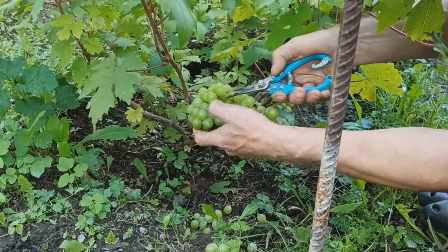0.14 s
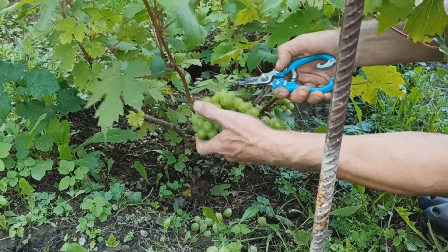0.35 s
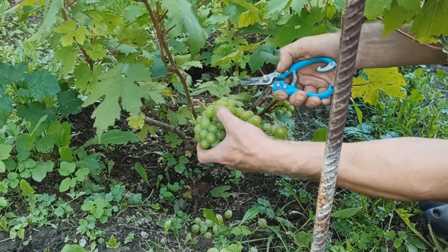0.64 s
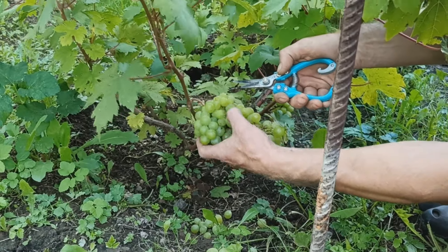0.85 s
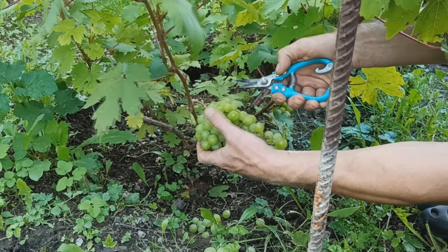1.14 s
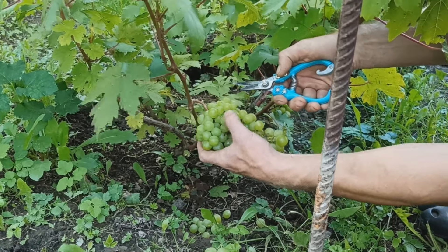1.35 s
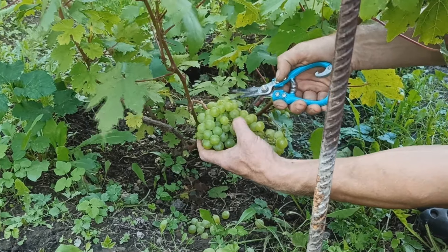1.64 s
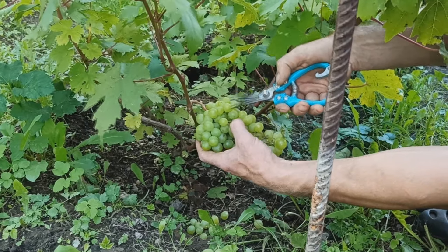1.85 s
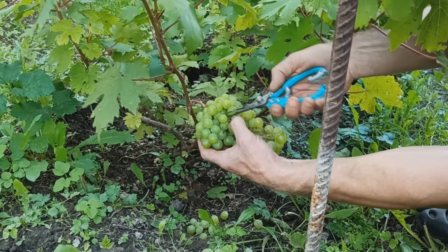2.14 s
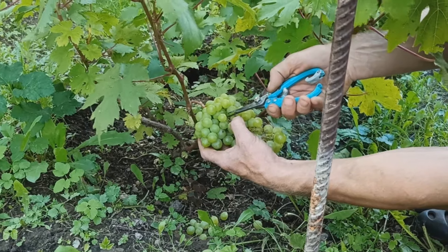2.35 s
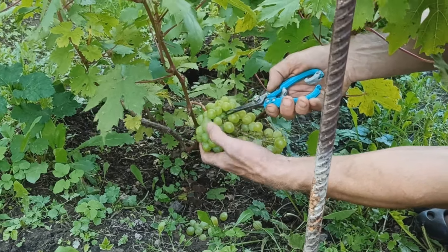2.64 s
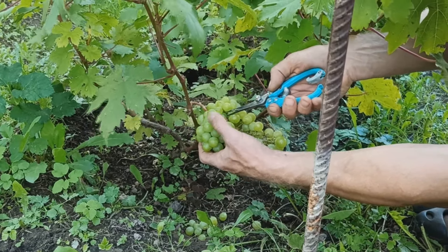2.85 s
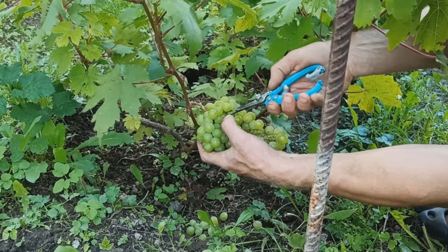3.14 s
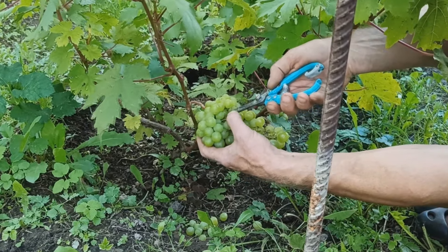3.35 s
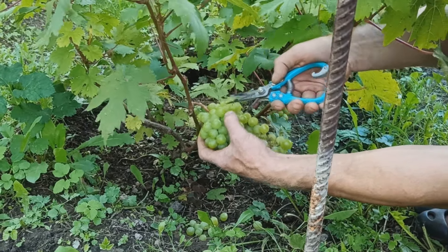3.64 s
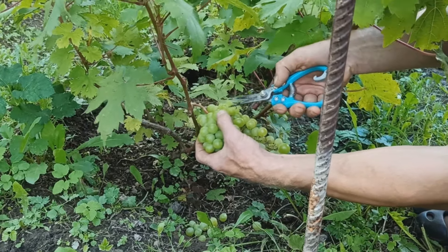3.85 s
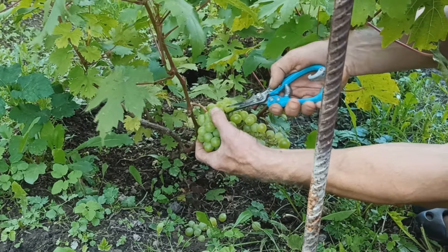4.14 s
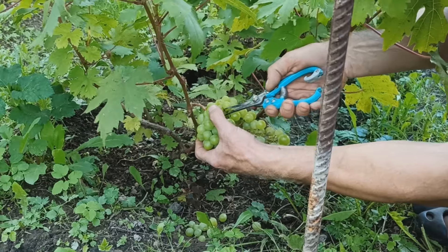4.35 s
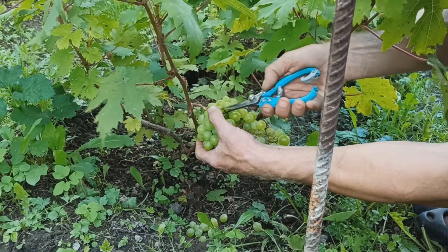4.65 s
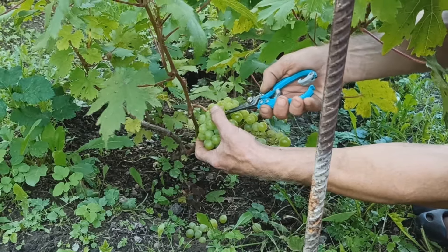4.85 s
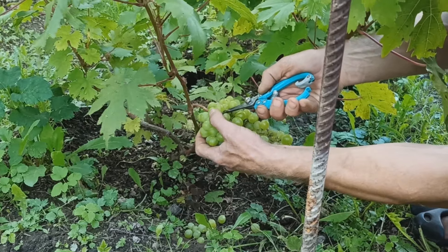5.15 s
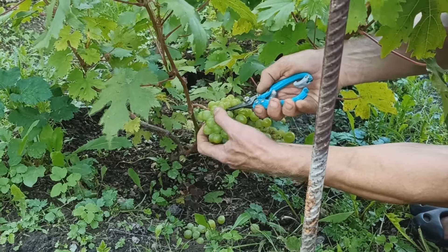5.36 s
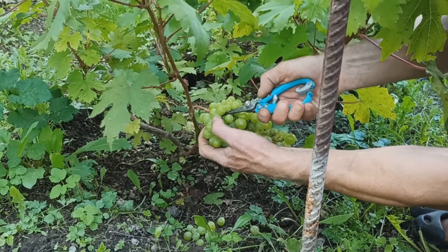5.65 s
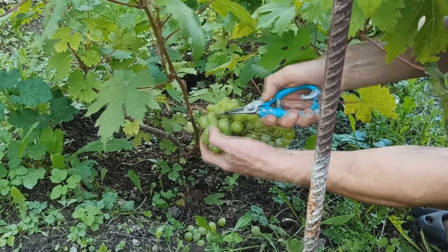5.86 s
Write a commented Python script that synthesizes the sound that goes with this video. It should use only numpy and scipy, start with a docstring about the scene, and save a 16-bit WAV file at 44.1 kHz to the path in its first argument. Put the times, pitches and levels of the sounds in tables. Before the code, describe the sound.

Faint metallic clicks and soft rubbing of garden shears among grapes over a low outdoor rumble, then a single crisp cut.

```python
"""A quiet garden rumbles faintly, and small pruning shears rub and tick in a tight bunch of grapes.
Friction between the berries makes a grainy rustle; each nicked stalk crunches and rings the steel.
Two cut berries thud on the soil, a few dull bumps pass, and the pivot squeaks by stick-slip friction.
Near the end a stalk fractures and the shears snap shut with one sharp snip."""
import sys
import numpy as np
from scipy import signal
from scipy.fft import rfft, irfft, next_fast_len
from scipy.io import wavfile

SR = 44100
rng = np.random.default_rng(int(sys.argv[2]) if len(sys.argv) > 2 else 0)


def store_wav(level_fs):
    """Save 16-bit WAV to argv[1]."""
    pcm = np.round(np.clip(np.atleast_2d(level_fs), -1, 1) * 32767)
    wavfile.write(sys.argv[1], SR, pcm.T.astype(np.int16))


N = 265261
TIME = np.arange(N) / SR
LEAD_S = 0.01  # room before each blow
BLOW_TIME = np.arange(SR // 6) / SR - LEAD_S
RING_TIME = np.maximum(BLOW_TIME, 0)


def amp(db):
    """Amplitude grows tenfold for every 20 dB."""
    return 10 ** (np.asarray(db) / 20)


def unit_rms(x):
    """Normalisation to a mean power of 1."""
    return x / np.sqrt(np.mean(x ** 2) + 1e-20)


def colour(x, points):
    """Spectral shaping: (frequency_hz, gain_db) points are joined along log frequency."""
    hz, db = np.transpose(points)
    size = next_fast_len(2 * len(x))
    bins = np.fft.rfftfreq(size, 1 / SR)
    gain = amp(np.interp(np.log(bins + 1), np.log(np.sort(hz) + 1), db))
    return irfft(rfft(x, size) * gain, size)[:len(x)]


def wander(hz):
    """Band-limited noise: a random fluctuation of rms 1, up to the given rate."""
    passband = np.fft.rfftfreq(N, 1 / SR) < hz
    return unit_rms(irfft(rfft(rng.standard_normal(N)) * passband, N))


def add(mix, start_s, sound):
    """Superposition: a sound adds to the mix from its start time."""
    part = mix[max(round(start_s * SR), 0):][:len(sound)]
    part += sound[:len(part)]


def ring(modes, detune=0):
    """Free vibration: a blow excites damped modes, each optionally detuned at random."""
    out = np.zeros(len(RING_TIME))
    for hz, db, t60 in modes:
        pitch_hz = hz * (1 + detune * rng.standard_normal())
        out += amp(db - 60 * RING_TIME / t60) * np.sin(2 * np.pi * pitch_hz * RING_TIME)
    return out


def crack(length_s):
    """Fracture radiates a brief noise burst, here with an even spectrum and energy 1."""
    age = BLOW_TIME / max(length_s / 2, 4 / SR)
    spectrum = rfft(rng.standard_normal(len(age)) * np.maximum(age, 0) * np.exp(-abs(age)))
    whitened = irfft(spectrum / (abs(spectrum) + 1e-12), len(age))
    burst = whitened * np.exp(-((age - 2) / 10) ** 2)
    return burst / np.linalg.norm(burst)


def foliage(x, level_db, t60_s):
    """Scattering from hands, leaves and ground adds a short diffuse tail."""
    t = np.arange(SR // 5) / SR
    build_up = 1 - np.exp(-(t / 0.0013) ** 2)
    tail = rng.standard_normal(len(t)) * amp(-60 * t / t60_s) * build_up
    return x + amp(level_db) * signal.oaconvolve(x, tail / np.linalg.norm(tail))[:N]


# Spectrum of the far outdoor rumble: frequency_hz, gain_db
RUMBLE_SPECTRUM = [(25, -21), (40, -17), (55, -10.5), (72, -3), (88, 1), (115, -2.5), (175, -3.5),
                   (215, -7.5), (320, -9), (550, -15), (720, -18), (900, -18), (1100, -23.5), (1400, -24),
                   (2600, -32), (4500, -38), (8000, -54)]

def garden(level_db=-59.5, easing_db_per_s=0.23):
    """Distant sound arrives as low-frequency noise, its level easing very slowly."""
    rumble = unit_rms(colour(rng.standard_normal(N), RUMBLE_SPECTRUM))
    return amp(level_db - easing_db_per_s * TIME) * rumble


def stroke(start_s, length_s, rise_s=0.024, fall_s=0.027):
    """Exponential envelope of the hand's pressure: 20 dB up per rise_s, a hold, 20 dB down per fall_s."""
    before = np.maximum(start_s - TIME, 0)
    after = np.maximum(TIME - start_s - length_s, 0)
    return amp(-20 * (before / rise_s + after / fall_s))


# Modes of the shears, shared by rubbing, ticks and snip: frequency_hz, level_db, t60_s
SHEAR_MODES = [(945, -7, .032), (1340, -16, .021), (1825, -14.5, .025), (2255, -13, .031),
               (3420, -12, .024), (3730, -8, .021), (4300, -15, .022), (4745, -19, .048), (5040, -11, .012),
               (5320, -4.5, .022), (6285, -10, .032), (6580, -2.5, .01), (6795, .5, .013),
               (7190, -12, .016), (7380, -12, .042), (7655, -5, .029), (8095, -9, .025), (8400, 1, .016),
               (12030, -8, .016), (12420, -11, .015), (13140, -8, .016), (13930, -12, .011),
               (14800, -10.5, .011)]
# Spectrum of the friction noise: frequency_hz, gain_db
RUB_SPECTRUM = [(300, -27), (2500, -10), (3600, 3), (5500, -3), (6800, -1), (8500, -3), (12000, -8),
                (16000, -17)]
# Strokes of the blades among the berries: start_s, length_s, level_db
BLADE_STROKES = [(0.24, 1.4, -82.5), (0.7, 0.0075, -66), (1.965, 0.24, -76), (3.682, .03, -73),
                 (4.37, 0.074, -78.5), (5.698, 0.24, -75.5), (5.75, 0.051, -56.5), (5.976, .04, -62.5)]

def rubbing(slips_per_s=2500, holding_db=-85):
    """Sliding friction: dense small slips of steel on steel and grape skin, under an uneven hand."""
    stroke_power = sum((amp(db) * stroke(start, length)) ** 2 for start, length, db in BLADE_STROKES)
    pressure = np.sqrt(amp(holding_db) ** 2 + stroke_power)  # the held bunch shifts between strokes
    slips = rng.standard_normal(N) * (rng.random(N) < slips_per_s / SR)
    steel = signal.oaconvolve(slips, ring(SHEAR_MODES))[:N]
    grain = unit_rms(slips) + amp(-8.5) * unit_rms(steel)
    return pressure * amp(2 * wander(hz=59.7)) * unit_rms(colour(grain, RUB_SPECTRUM))


# Modes of the light return spring: frequency_hz, level_db, t60_s
SPRING_MODES = [(3700, 4, 0.036), (4260, -9, 0.043), (6680, -1, 0.031), (7500, -1, 0.033),
                (13000, 0.5, 0.041)]
# Spectrum common to all ticks: frequency_hz, gain_db
TICK_SPECTRUM = [(100, 3), (900, 1.5), (2900, 2), (3600, 1.5), (4200, 5.5), (5300, 1), (6500, -2.5),
                 (8500, -8.5), (13000, 0), (16000, -1.5)]
# Tone of the faintest touches of the tips: top_treble_db, low_treble_db, knock_db
GRAZE_BALANCE = (-18, -10, -10)
# Blade ticks: start_s, relative_level_db, top_treble_db, low_treble_db, knock_db
BLADE_TICKS = [(0.258, -41, -2.5, -23, -25), (0.3314, -39.5, -13, -13.5, -31),
               (0.377, -41.5, -5, -12.5, -24), (0.4068, -48.5, -1, -10, -16), (0.4197, -55, -5, -2, -13),
               (0.465, -55.5, -14, -5, -10), (0.488, -45.5, -14, -9.5, -23), (0.622, -41, -15, -11.5, -15),
               (2.078, -47.5, -21, -15, -4.5), (2.1629, -33.5, -12, -17.5, -20),
               (2.166, -40, -22, -23, -22), (2.184, -37, -19, -15.5, -10.5), (2.309, -48.5, -25, -14, -0.5),
               (2.9383, -34, -12.5, -29, -32), (3.1417, -35, -19, -16, -36), (3.165, -39.5, -14, -13, -22),
               (3.3936, -47, -28, -25, -21), (4.0763, -55.5, -18, -4.5, -1), (4.7618, -41.5, -17, -17, -26),
               (4.793, -39.5, -11, -13.5, -15), (5.144, -56.5, -14, -3, -4), (5.323, -47.5, -14, -9, -22),
               (5.3342, -39.5, -11, -12, -28), (5.346, -39.5, -13, -12.5, -23), (5.388, -40, -10, -22, -29),
               (5.4756, -51.5, -17, -7.5, 1), (5.5025, -51, -12, -16, -18), (5.7497, -36, -7.5, -16.5, -7),
               (5.8232, -43.5, -18, -7.5, -20)]

def ticks(grazes_per_s=2.5, graze_db=-62.5, firm_db=-34, firm_crunch_s=0.0013):
    """Impulsive excitation: the tips nick thin stalks, which crunch and set steel and spring ringing."""
    out = np.zeros(N)
    graze_times = np.flatnonzero(rng.random(N) < grazes_per_s / SR) / SR
    grazes = [(s, graze_db + 3 * rng.standard_normal(), *GRAZE_BALANCE) for s in graze_times]
    for start_s, db, top_db, low_db, knock_db in BLADE_TICKS + grazes:
        crunch = crack(firm_crunch_s * 2 ** ((firm_db - db) / 19))  # 19 dB gentler lasts twice as long
        steel = amp(-32) * ring(SHEAR_MODES, detune=0.017)
        spring = amp(-31.5) * ring(SPRING_MODES, detune=0.015)
        tone = [(2400, knock_db + 4), (3400, low_db + 5), (5500, low_db + 11),
                (6300, 0), (9000, 0), (12000, top_db + 10)]
        add(out, start_s - LEAD_S, amp(db + 12.5) * colour(crunch + steel + spring, tone))
    return foliage(colour(out, TICK_SPECTRUM), level_db=-11, t60_s=0.051)


# Modes of a berry on the ground: frequency_hz, level_db, t60_s
SOIL_MODES = [(141, -1.5, .04), (397, -7, 0.033), (730, -4, 0.027), (1250, -10.5, 0.03), (2140, -23, 0.022)]
# Berries landing: start_s, level_db, contact_s
BERRY_DROPS = [(0.9854, -48, 0.00026), (1.0471, -41, 0.00014)]

def berries():
    """Soft impact: a force pulse on the soil, a heavily damped knock and a rustle of litter."""
    out = np.zeros(N)
    for start_s, db, contact_s in BERRY_DROPS:
        push = np.exp(-(BLOW_TIME / contact_s) ** 2 / 2)
        litter = amp(11) * colour(crack(0.0045), [(2200, 6), (4500, -24)])
        add(out, start_s - LEAD_S, amp(db) * (push + ring(SOIL_MODES) + litter))
    return out


# Soft dull bumps: centre_s, level_db, frequency_hz, half_length_s
DULL_BUMPS = [(1.26, -60, 104, 0.018), (1.375, -58, 87, 0.047), (3.226, -57, 320, 0.012),
              (3.29, -62.5, 410, 0.013)]

def bumps():
    """Amplitude modulation: low noise under a short Gaussian swell is heard as a bump."""
    out = np.zeros(N)
    for centre_s, db, hz, half_length_s in DULL_BUMPS:
        band = [(hz / 3, -50), (hz * 0.86, 0), (hz * 0.92, 0), (hz * 3, -30), (hz * 10, -70)]
        swell = np.exp(-((TIME - centre_s) / half_length_s) ** 2 / 2)
        out += amp(db) * swell * unit_rms(colour(rng.standard_normal(N), band))
    return out


# The pivot as the shears open: time_s, pitch_hz, fundamental_db, octave_db
PIVOT_CURVE = [(3.57, 1740, -96, -84), (3.6, 1725, -81, -69), (3.66, 1707, -85, -76),
               (3.70, 1730, -67, -69), (3.73, 1685, -82, -82), (3.8, 1700, -95, -84)]

def squeak():
    """Stick-slip oscillation: the dry pivot sounds an unsteady pitch and its octave."""
    times, *columns = np.transpose(PIVOT_CURVE)
    pitch_hz, fundamental_db, octave_db = [np.interp(TIME, times, column) for column in columns]
    phase = 2 * np.pi * np.cumsum(pitch_hz * (1 + 0.04 * wander(hz=700))) / SR
    grip = (TIME > times[0]) * (TIME < times[-1]) * amp(3 * wander(hz=120))
    return grip * (amp(fundamental_db + 1.5) * np.sin(phase) + amp(octave_db) * np.sin(2 * phase))


# Radiation of small shears, weak in the bass: frequency_hz, gain_db
SHEAR_RADIATION = [(100, -26.5), (400, -7), (800, 0.5)]
# Spectrum of the snip's crunch: frequency_hz, gain_db
SNIP_SPECTRUM = [(70, -14.5), (250, -6), (500, -1.5), (780, 3.5), (1000, -1), (2000, -5), (2900, -3),
                 (3400, 3.5), (5500, -3.5), (6600, 1.5), (8200, 1), (9500, 4), (12000, 3.5), (16000, 1.5)]
# The stalk cracks, the handles meet and rebound: start_s, crunch_db, crunch_length_s, ring_db
SNIP_BLOWS = [(5.77, -8, 0.0005, -21.5), (5.7723, 0.5, 0.00053, 0.5), (5.7729, 0.5, .0006, -15.5),
              (5.7768, -19.5, 0.00076, -30), (5.784, -20.5, 0.004, -40.5)]

def snip():
    """Fracture and impact: the stalk breaks and the shears slam shut, ringing briefly in their modes."""
    cracks, steel = np.zeros(N), np.zeros(N)
    onset = 1 - np.exp(-RING_TIME / 0.00007)  # the blow takes a moment to spread through the tool
    for start_s, crunch_db, length_s, ring_db in SNIP_BLOWS:
        add(cracks, start_s - LEAD_S - length_s / 2, amp(crunch_db - 2) * crack(length_s))
        add(steel, start_s - LEAD_S, amp(ring_db - 22.5) * onset * ring(SHEAR_MODES))
    direct = colour(cracks, SNIP_SPECTRUM) + colour(steel, SHEAR_RADIATION)
    return foliage(direct, level_db=-17, t60_s=0.075)


def scene():
    """Superposition: the pressures of garden, shears and berries sum in one channel."""
    return (garden() + rubbing() + ticks() + berries() + bumps() + squeak() + snip())[None]


# Frequency response of the microphone: frequency_hz, gain_db
MIC_RESPONSE = [(25, -20), (75, -0.5), (6000, 0.5), (6180, 8.5), (7650, 10), (7850, 8.5), (8500, 4.5),
                (8700, -8.5), (10400, -22.5), (11450, -19), (11700, -4)]
# Spectrum of its self-noise: frequency_hz, gain_db
HISS_SPECTRUM = [(2000, 1.5), (3200, 0.5), (4650, 3.5), (4850, -12.5), (6000, -2.5), (6200, 2), (7600, 4.5),
                 (7850, -6), (8450, -9), (8700, -14.5), (11450, -15), (11700, -4), (12800, -5.5),
                 (13300, 0.5), (15700, -0.5)]

def record(dry, cutoff_hz=15850):
    """Transduction: a microphone adds a treble peak and notch, its own hiss and a band limit."""
    hiss = amp(-70.5) * unit_rms(colour(rng.standard_normal(N), HISS_SPECTRUM))
    lowpass = signal.firwin(511, cutoff_hz, window=("kaiser", 9), fs=SR)
    return signal.oaconvolve(colour(dry[0], MIC_RESPONSE) + hiss, lowpass, "same")[None]


dry = scene()
out = record(dry)
store_wav(out)
```